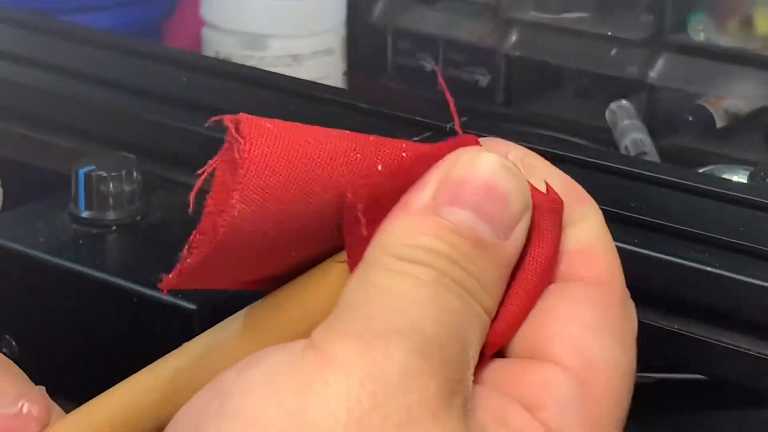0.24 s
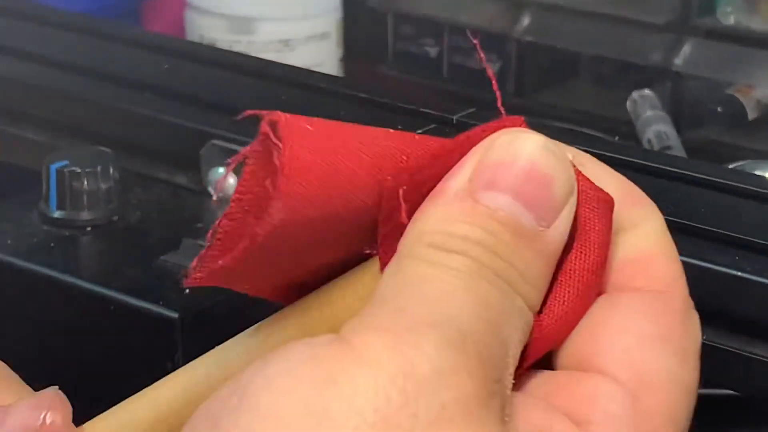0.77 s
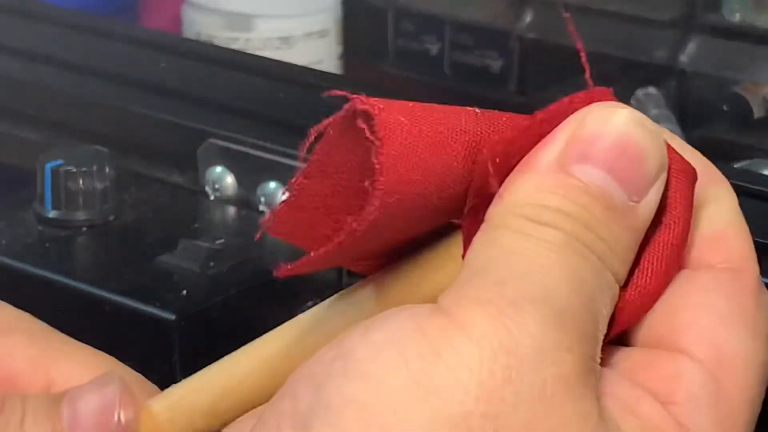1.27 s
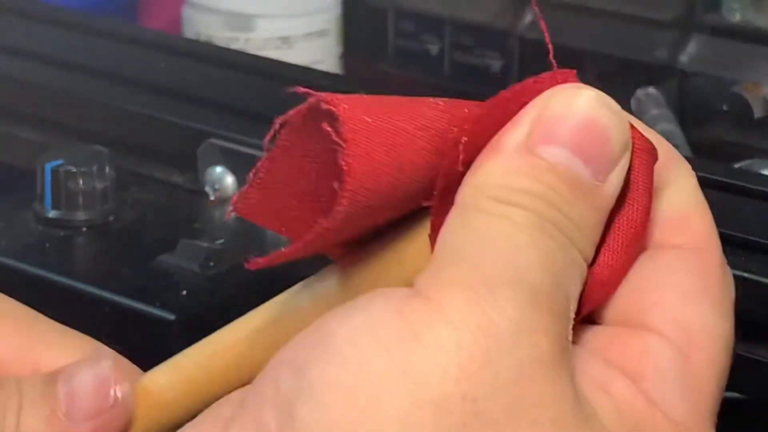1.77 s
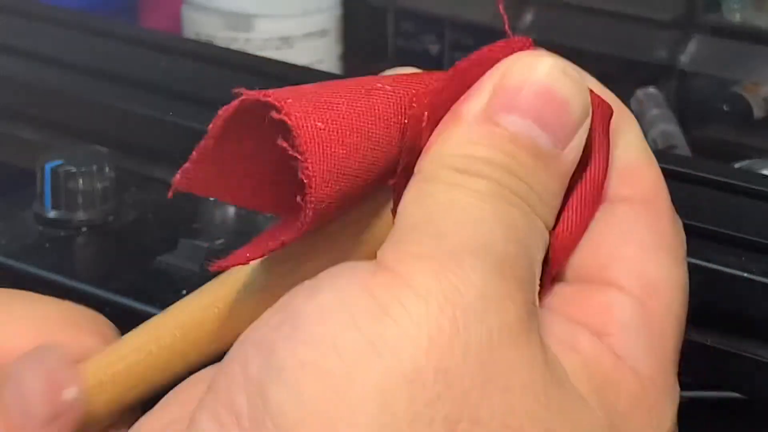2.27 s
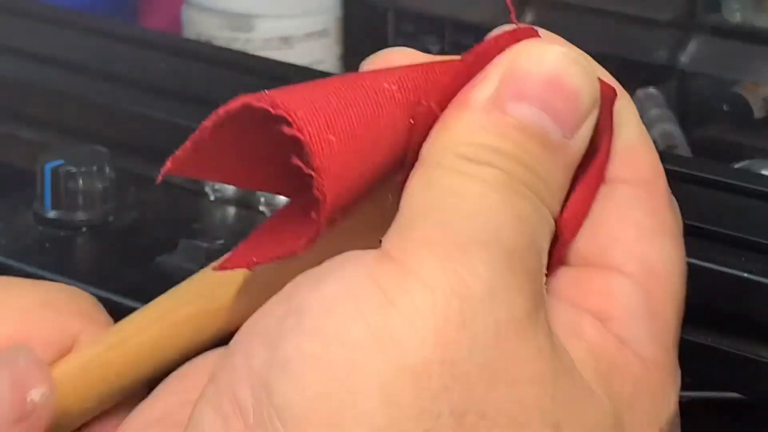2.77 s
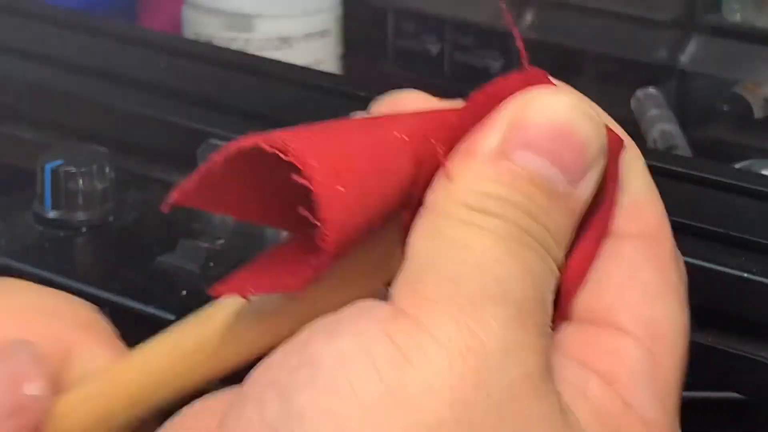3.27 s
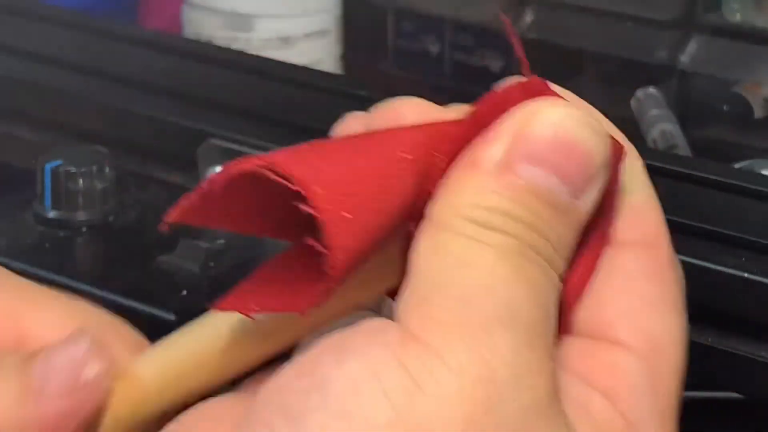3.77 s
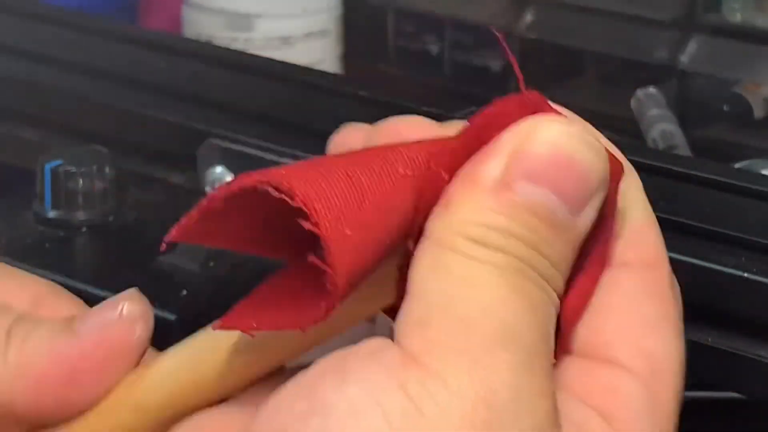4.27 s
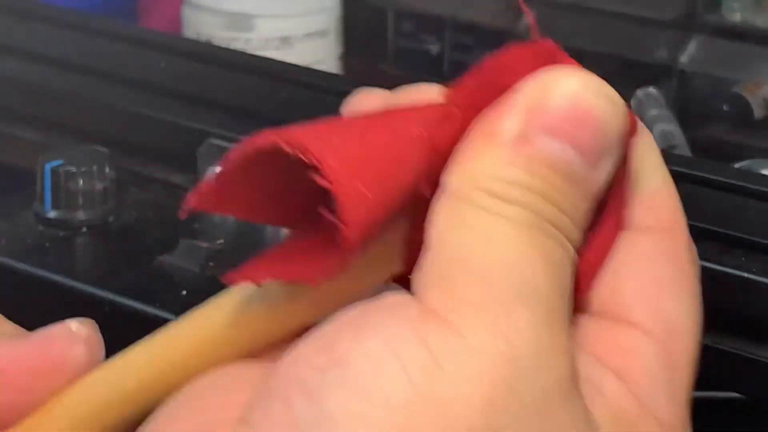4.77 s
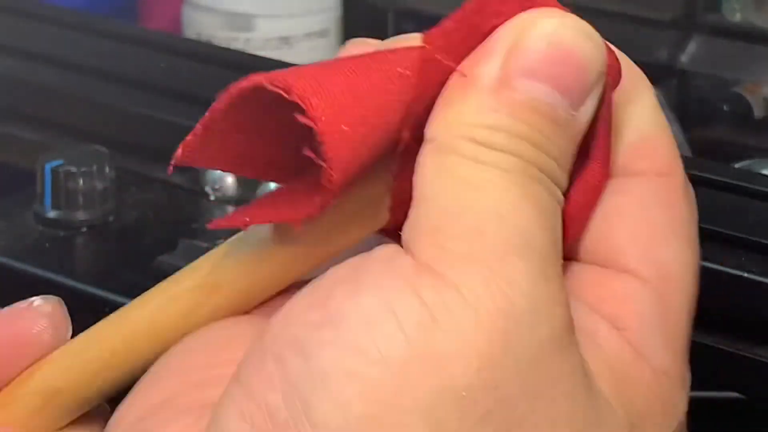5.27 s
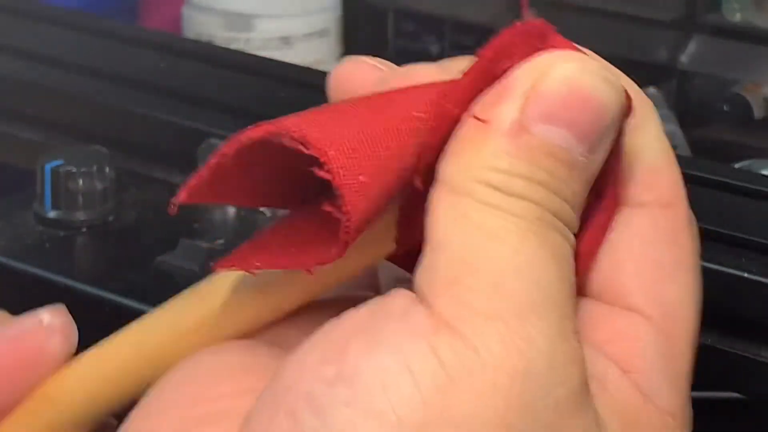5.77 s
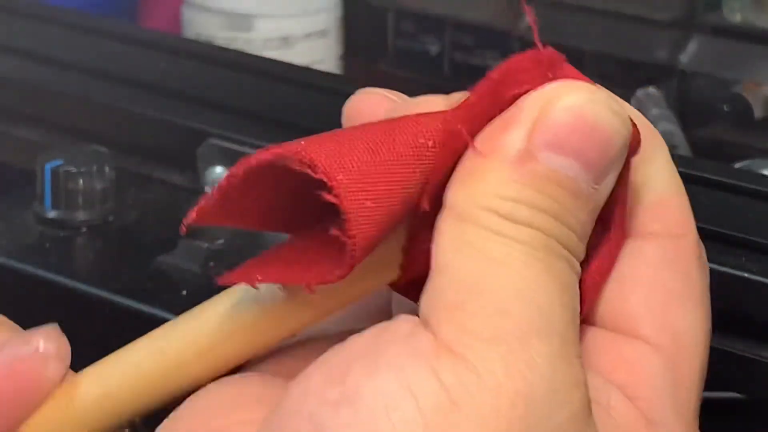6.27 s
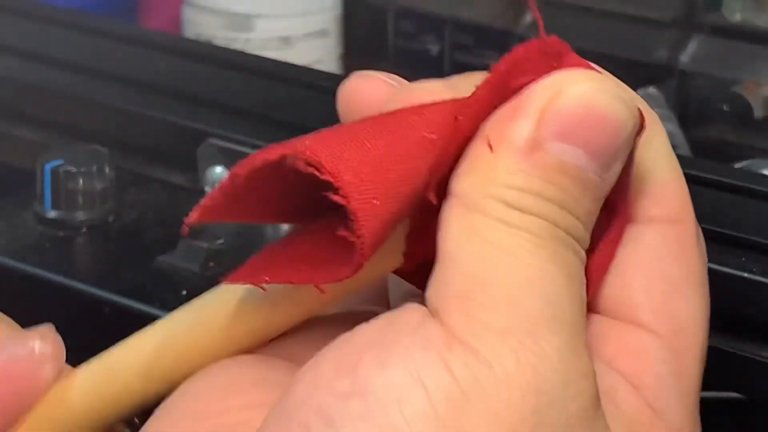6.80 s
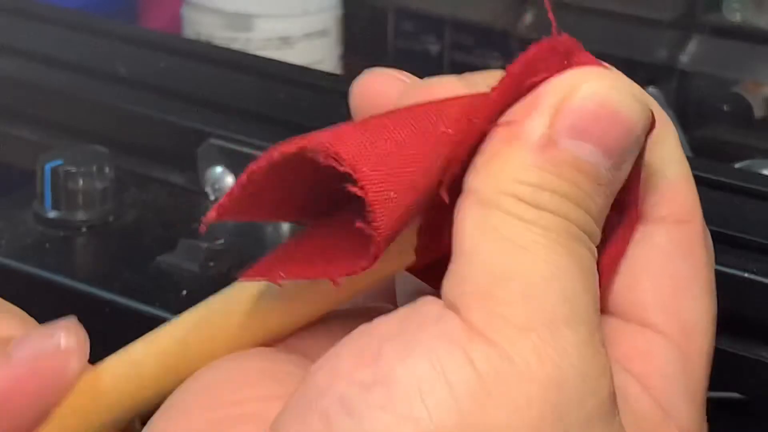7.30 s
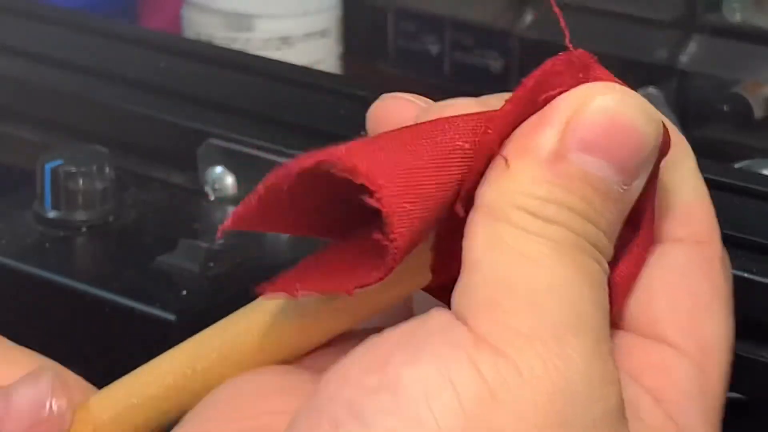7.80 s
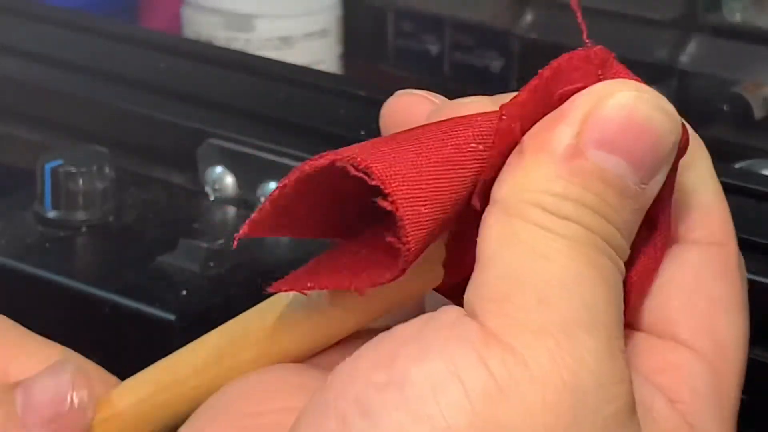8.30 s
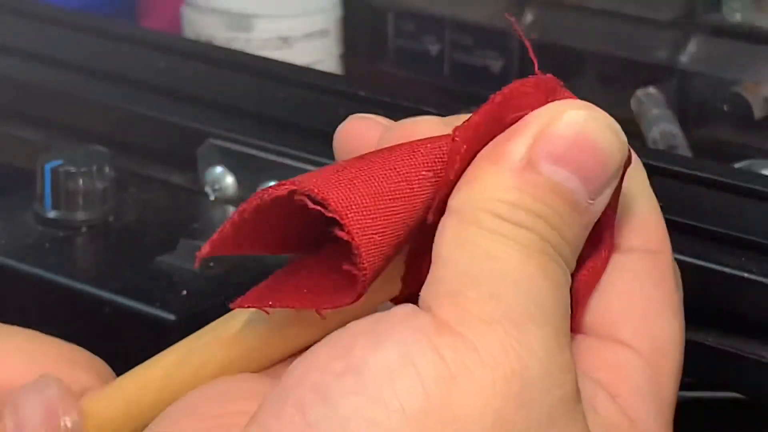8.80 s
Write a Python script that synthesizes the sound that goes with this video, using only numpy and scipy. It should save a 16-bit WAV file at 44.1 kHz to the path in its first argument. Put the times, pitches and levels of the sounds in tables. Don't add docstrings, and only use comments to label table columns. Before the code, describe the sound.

Thumb rubs coarse fabric on a leather-tipped wooden stick: short crisp zipper-like scratches in steady rhythm, faint rustles between, quiet room hum and hiss.

```python
import sys
import numpy as np
from scipy import signal
from scipy.fft import rfft, irfft
from scipy.io import wavfile
from scipy.ndimage import uniform_filter1d

SR = 44100
rng = np.random.default_rng(int(sys.argv[2]) if len(sys.argv) > 2 else 0)


def output_pcm(signal):
    pcm = np.clip(np.atleast_2d(signal).T, -1, 1) * 32767
    wavfile.write(sys.argv[1], SR, np.round(pcm).astype(np.int16))


def linear_from_db(decibels):
    return 10 ** (np.asarray(decibels, float) / 20)


N = 399105
LEFT_LAG_S = 0.0002148

# (time [s], grip resonance [Hz], shaft thud [dB], cloth cone [dB], brightness [dB])
PUSHES = [(.17, 2220, 4.5, 3.5, -5), (.70, 3820, -3.5, -2.5, -1), (1.25, 3580, -3.5, 0.5, 2),
          (1.80, 3800, -8, -7, 0.5), (2.35, 3640, -3, -3, 4), (2.90, 4600, 2, -1.5, 1),
          (3.44, 4500, -0.5, -2, 1.5), (4.00, 3050, -6.5, -4, -3), (4.57, 3600, -3, -1, -1),
          (5.10, 3270, -4, -1, -0.5), (5.70, 3640, -1.5, -0.5, 1.5), (6.20, 3670, -6, -1.5, 1.5),
          (6.73, 2580, -5, -2, 1), (7.24, 3800, -2.5, 3.5, 0), (7.80, 3750, -3, 0, 1.5),
          (8.31, 2500, -6.5, -1.5, 1), (8.86, 3140, -3, -2, 2)]
# (tick time [s], tick [dB], brush [dB], rest [dB], rustle before the next push [dB])
RETURNS = [(0.471, -51, -55.5, -81, -59.5), (1.0362, -51.5, -57.5, -77, -56),
           (1.571, -52.5, -62.5, -74, -61.5), (2.1125, -52.5, -50.5, -66, -59.5),
           (2.636, -50.5, -54.5, -75, -60), (3.1965, -53.5, -56, -70.5, -61.5),
           (3.742, -47.5, -59, -80.5, -63.5), (4.2878, -49.5, -59, -69.5, -62.5),
           (4.841, -54, -50, -64.5, -62.5), (5.4356, -52.5, -59.5, -72.5, -60.5),
           (5.9538, -52, -55, -75, -60.5), (6.4701, -52, -60.5, -77, -60),
           (7.0203, -51.5, -53.5, -65, -62.5), (7.5, -51, -60.5, -78, -60.5),
           (8.0818, -52, -66, -92, -61.5), (8.578, -51, -57, -77, -62)]


def unit(x):
    return x / np.sqrt(np.mean(x ** 2))


def curve(table):
    return np.interp(np.arange(N) / SR, *np.transpose(table))


def shape(points, hz):
    f, v = np.transpose(points)
    return np.interp(np.log(hz + 1), np.log(f), v)


def colour(x, points, modes=()):
    size = 4096
    hz = np.arange(size // 2 + 1) * SR / size
    db = shape(points, hz) + sum(g / (1 + (2 * (hz - f) / w) ** 2) for f, w, g in modes)
    cepstrum = irfft(np.log(linear_from_db(db)))
    cepstrum[1:size // 2] *= 2
    cepstrum[size // 2 + 1:] = 0
    ring = irfft(np.exp(rfft(cepstrum)))
    return signal.fftconvolve(x, ring / np.sqrt(np.sum(ring ** 2)))[:len(x)]


def walk(rate_hz):
    hold = int(SR / rate_hz)
    steps = np.repeat(rng.standard_normal(N // hold + 1), hold)
    return unit(uniform_filter1d(steps, hold)[:N])


def late(x, delay_s):
    hz = np.fft.rfftfreq(N, 1 / SR)
    return irfft(rfft(x) * np.exp(-2j * np.pi * hz * delay_s), N)


def cloth():
    # (frequency [Hz], level [dB])
    edge = [(3000, -22.5), (5500, 0.5), (7500, 3), (9500, -1.5), (11500, -4), (14000, -16), (16000, -21.5)]
    # (frequency [Hz], level [dB])
    body = [(60, -34), (110, -8.5), (250, -4), (600, -7), (1100, -3.5), (2000, 2), (3000, 0), (4500, 0),
            (6000, -13.5), (8000, -19)]
    # (frequency [Hz], width [Hz], gain [dB])
    shaft = [(254, 100, 4.5), (462, 70, 6.5), (1052, 40, 5), (1630, 23, 4), (2040, 8.7, -3.5),
             (2510, 590, 4.5), (3050, 130, 0.5), (3750, 50, 4.5), (4210, 100, -11), (5060, 130, 0)]
    lead_s = 0.06
    s, db = snaps()
    pushes = np.array(PUSHES)
    own = pushes[np.clip(np.searchsorted(pushes[:, 0], s + lead_s) - 1, 0, None)]
    into_s = np.clip(s - own[:, 0], 0, .2)
    fade_db_per_s, scatter_db = 18, 1
    edge_db = db + own[:, 4] - fade_db_per_s * (into_s - .07) * (db > -42)
    edge_db = edge_db + scatter_db * rng.standard_normal(len(s))
    out = brush() + colour(linear_from_db(1.0) * bursts(s, edge_db, 0.00063, 0.00094, 2.05)[0], edge)
    hidden = linear_from_db(-5.5) * bursts(s, edge_db, 0.00055, 0.0006, 0, channels=2)
    scatter = np.array([colour(x, edge) for x in hidden])
    blow_db = db + 0.27 * np.minimum(db + 34.5, 0)
    blows = linear_from_db(4.5) * bursts(s, blow_db, 0.00071, 0.00091, 4.64)[0]
    blows = blows + linear_from_db(-15.0) * bursts(s, db, 0.008, 0.028, 0)[0]
    lag_1khz_s = 0.001453
    khz = np.fft.rfftfreq(N, 1 / SR) / 1000
    blows = late(blows, 2 * lag_1khz_s / np.sqrt(0.085 + khz) - .0006)
    starts = [0] + [int((p[0] - lead_s) * SR) for p in PUSHES[1:]] + [N]
    for (_, grip_hz, thud_db, cone_db, _), a, b in zip(PUSHES, starts, starts[1:]):
        damping = 1 + .15 * rng.standard_normal(len(shaft))
        modes = [(f, w, g * d) for (f, w, g), d in zip(shaft, damping)]
        grip = [(grip_hz, 900, 3), (500, 1200, thud_db + 6.0), (2000, 1300, cone_db)]
        out[a:b] += colour(blows[a:b], body, modes + grip)
    return out, scatter + hands(out)


def snaps():
    # (first [s], last [s], snaps [count], strength [dB], drag: extra starting gap [ratio])
    runs = [(0.1784, 0.315, 13, -34.5, 0.49), (.7933, 0.871, 8, -31, 0.21), (1.2579, 1.34, 7, -33.5, -0.15),
            (1.3533, 1.4097, 7, -27.5, 0.17), (1.83, 1.8887, 5, -25.5, 0.31), (1.9, 1.9604, 7, -25.5, -.3),
            (2.3549, 2.4317, 7, -29, 0.11), (2.4437, 2.5016, 7, -29, 0.19), (2.9206, 3.04, 11, -29, 0.74),
            (3.4396, 3.585, 15, -28, 0.64), (4.0052, 4.1247, 13, -25, 0.27),
            (4.5867, 4.711, 14, -26.5, .55), (5.1031, 5.184, 8, -28, .05), (5.1946, 5.2564, 8, -26.5, 0.27),
            (5.7151, 5.8128, 11, -29, .15), (6.2067, 6.3016, 11, -26.5, .45),
            (6.7299, 6.8304, 12, -27.5, 0.89), (7.281, 7.346, 8, -28, -.1), (7.7998, 7.886, 9, -24.5, 0.27),
            (8.3136, 8.4136, 11, -26.5, 0.37), (8.866, 8.9481, 10, -26.5, 0.67)]
    # (time [s], strength [dB])
    strays = [(0.1068, -47), (.1529, -47.5), (0.7067, -39), (0.7233, -36), (0.7448, -34.5), (1.7858, -48),
              (1.799, -42.5), (1.809, -33), (2.335, -52), (2.908, -38.5), (3.066, -46), (3.427, -43),
              (4.1342, -32), (4.154, -43), (4.565, -51), (4.5739, -35), (5.2676, -38.5), (5.698, -28),
              (6.1706, -39.5), (6.194, -39), (6.318, -52.5), (6.841, -35.5), (6.85, -48), (7.2448, -31),
              (7.2632, -25), (7.3552, -47), (7.7719, -39), (7.7857, -40), (8.8436, -46.5)]
    # (offset [s], level [dB])
    side_ticks = [(-.026, -5.5), (-.013, -7.5), (.015, -7)]
    speed_up, brake, brake_share = 1.6, .45, .08
    gap_scatter, snap_scatter_db = .05, 1.24
    ease_in_db, ease_in_snaps, ease_out_db = 3.5, 0.92, 2.2
    rows = [np.array(strays)]
    for (first, last, n, db, drag), chance in zip(runs, rng.standard_normal((len(runs), 2, 20))):
        k = np.arange(round(n))
        along = k[:-1] / k[-2]
        gaps = 1 + drag * (1 - along) ** speed_up + brake * np.exp((along - 1) / brake_share)
        gaps = gaps * (1 + gap_scatter * chance[0, k[1:]])
        s = first + (last - first) * np.r_[0, np.cumsum(gaps)] / gaps.sum()
        ease_db = ease_in_db * np.exp(-k / ease_in_snaps) + ease_out_db * k / k[-1]
        rows.append(np.c_[s, db - ease_db + snap_scatter_db * chance[1, k]])
    for (s, db, *_), chance in zip(RETURNS, rng.standard_normal((len(RETURNS), len(side_ticks), 2))):
        sides = (s, db) + np.array(side_ticks) + chance * (.003, 3)
        rows.append(np.r_[[(s, db)], sides])
    return np.concatenate(rows).T


def bursts(s, db, rise_s, fall_s, crack, channels=1):
    marks = np.zeros(N)
    np.add.at(marks, (s * SR).astype(int), linear_from_db(db))
    t = np.arange(-400, 401) / SR
    puff = np.where(t < 0, np.exp(-(t / rise_s) ** 2), np.exp(-np.abs(t) / fall_s))
    fibres = signal.lfilter([1, -.8], 1, np.sign(rng.standard_normal((channels, N))))
    return np.abs(signal.fftconvolve(marks, puff, "same")) * fibres + crack * marks


def brush():
    # (frequency [Hz], level [dB])
    fibre_spectrum = [(600, -19), (1500, -1), (2800, -4.5), (4500, -3), (7000, -4.5), (10000, -6.5),
                      (13000, -11.5), (16000, -14)]
    # (time [s], pitch [Hz], level [dB])
    squeak_track = [
        (7.07, 2760, -96),
        (7.1, 2570, -77),
        (7.15, 2520, -70),
        (7.19, 2350, -77),
        (7.22, 2280, -96),
    ]
    rustle = linear_from_db(slide() + 2.25 * walk(300) + 0.86 * walk(60)) * rng.standard_normal(N)
    s, hz, db = np.transpose(squeak_track)
    phase = 2 * np.pi * np.cumsum(curve(np.c_[s, hz]) * (1 + 0.002 * walk(200))) / SR
    squeak = 0.6 * np.sin(phase) + np.sin(2 * phase) + .7 * np.sin(3 * phase)
    squeak = squeak + 1.3 * np.sin(1.63 * phase)
    return linear_from_db(-6.5) * colour(rustle, fibre_spectrum) + linear_from_db(curve(np.c_[s, db])) * squeak


def slide():
    held_db = -64
    points = [(0, held_db)]
    for (s, _, brush_db, rest_db, ready_db), push in zip(RETURNS, PUSHES[1:]):
        points += [(s - 0.065, held_db - 0.5), (s - 0.025, brush_db), (s + .025, brush_db - 6.5),
                   (s + 0.06, rest_db), (push[0] - 0.006, ready_db)]
        held_db = ready_db
    return curve(points)


def hands(x):
    shift = 3500
    t = np.arange(1500) / SR
    out = np.zeros((2, N + 4 * shift))
    fade = np.sin(np.pi * np.arange(2 * shift) / (2 * shift))
    band = signal.butter(3, [620, 5400], "band", fs=SR, output="sos")
    for a in range(0, N, shift):
        echoes = rng.standard_normal((2, len(t))) * linear_from_db(-15 - 60 * t / 0.02) * (t > .0006)
        part = x[a:a + 2 * shift]
        part = (part * fade[:len(part)])[None]
        heard = signal.fftconvolve(part, signal.sosfilt(band, echoes), axes=1)
        out[:, a:a + heard.shape[1]] += heard
    return out[:, :N]


def ports(shared):
    return np.array([late(shared, LEFT_LAG_S), shared])


def shop(x):
    # (frequency [Hz], T60 [s])
    t60 = [(300, 0.25), (2000, 0.28), (6000, 0.18), (12000, 0.043)]
    t = np.arange(SR // 2) / SR
    hz = np.fft.rfftfreq(len(t), 1 / SR)
    far, tail = rfft(rng.standard_normal((2, len(t)))), 0
    onset = 1 - np.exp(-t / 0.00056)
    for centre_hz in 125 * 2. ** np.arange(8):
        octave = np.clip(1 - np.abs(np.log2((hz + 1) / centre_hz)), 0, 1)
        decay = linear_from_db(-60 * t / shape(t60, centre_hz))
        tail = tail + linear_from_db(-32.5) * irfft(far * octave, len(t)) * decay * onset
    return signal.fftconvolve(x[None], tail, axes=1)[:, :N]


def share_treble(room):
    # (frequency [Hz], share [0-1])
    one_side = [(5200, 0), (6300, 0.58), (12000, 0.82)]
    share = np.clip(shape(one_side, np.fft.rfftfreq(N, 1 / SR)), 0, 1)
    copy = rfft(late(room[1], LEFT_LAG_S))
    left = irfft(np.sqrt(1 - share ** 2) * rfft(room[0]) + share * copy, N)
    return np.array([left, room[1]])


def ventilation():
    # (frequency [Hz], level [dB])
    air = [(18, -73), (28, -27.5), (40, 1.5), (55, 9.5), (75, -6.5), (110, -9), (170, -13.5), (260, -9.5),
           (340, -20.5), (560, -47.5)]
    # (time [s], level [dB])
    flow = [(0.0, -51.5), (0.45, -64), (0.58, -49), (1.06, -48), (1.16, -54.5), (2.09, -44.5), (2.11, -59),
            (2.44, -53), (2.92, -57), (3.58, -50), (4.66, -58.5), (4.69, -50), (5.8, -52.5), (8.09, -48.5),
            (8.14, -63), (8.37, -37), (8.57, -58.5), (9.05, -52)]
    # (time [s], level [dB])
    motor_level = [
        (0, -66),
        (.5, -66),
        (1.8, -62.5),
        (2.6, -74),
        (3.5, -71),
        (4.4, -64),
        (4.9, -77.5),
        (9.05, -90),
    ]
    # (frequency [Hz], level [dB])
    motor_lines = [(107.7, 3.5), (145.3, -2.5), (247.6, -6)]
    # (frequency [Hz], level [dB])
    hiss_spectrum = [(400, 9), (600, 1.5), (900, 5), (1300, 8), (2000, -2), (3300, -20.5), (5000, -25.5),
                     (10000, -39), (15000, -26.5)]
    # (time [s], level [dB])
    drone = [
        (0, -73.5),
        (1.3, -75.5),
        (3.5, -72),
        (5, -76),
        (6.5, -80),
        (9.05, -80.5),
    ]
    low = [colour(rng.standard_normal(N), air) for _ in range(2)]
    deep = signal.sosfiltfilt(signal.butter(2, 75, fs=SR, output="sos"), low[0])
    swell = np.sqrt(uniform_filter1d(deep ** 2, size=4000)) + .06
    t = np.arange(N) / SR
    motor = sum(linear_from_db(db + 2 * walk(6.7)) * np.sin(2 * np.pi * hz * t) for hz, db in motor_lines)
    gust_db, gusts_per_s = 1.5, 6
    shared = deep / swell * linear_from_db(curve(flow) + gust_db * walk(gusts_per_s))
    shared = shared + linear_from_db(-53.5) * (low[0] - deep) + linear_from_db(curve(motor_level)) * motor
    rumble = np.array([linear_from_db(0.74) * late(shared, -0.00041), linear_from_db(1.43) * shared])
    rumble = rumble + linear_from_db(-68) * np.array([low[1], -low[1]])
    hiss = np.array([colour(rng.standard_normal(N), hiss_spectrum) for _ in range(2)])
    return rumble + linear_from_db(curve(drone) + 10.5 + 0.29 * walk(3.7)) * hiss


def scene():
    # (frequency [Hz], left minus right [dB])
    balance = [(120, -3.5), (300, 3), (700, 5.5), (1500, 2.5), (4000, 0.7), (12000, 0.5)]
    rub, scatter = cloth()
    heard = linear_from_db(-3.5) * (ports(rub) + scatter + share_treble(shop(rub)))
    lean_db = shape(balance, np.fft.rfftfreq(N, 1 / SR))
    return irfft(rfft(heard) * linear_from_db([lean_db / 2, -lean_db / 2]), N) + share_treble(ventilation())


def top_cut(x):
    return signal.sosfilt(signal.butter(12, 16500, fs=SR, output="sos"), x)


def record(dry):
    low_pass = signal.cheby1(10, .3, 15900, fs=SR, output="sos")
    return top_cut(signal.sosfilt(low_pass, dry))


dry = scene()
out = record(dry)
output_pcm(out)
```